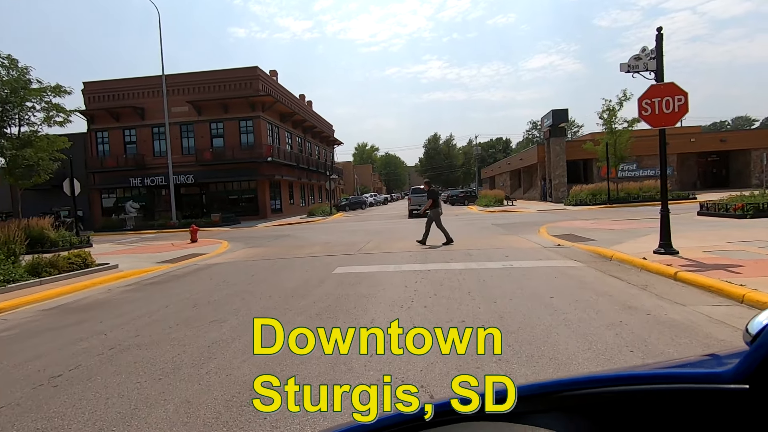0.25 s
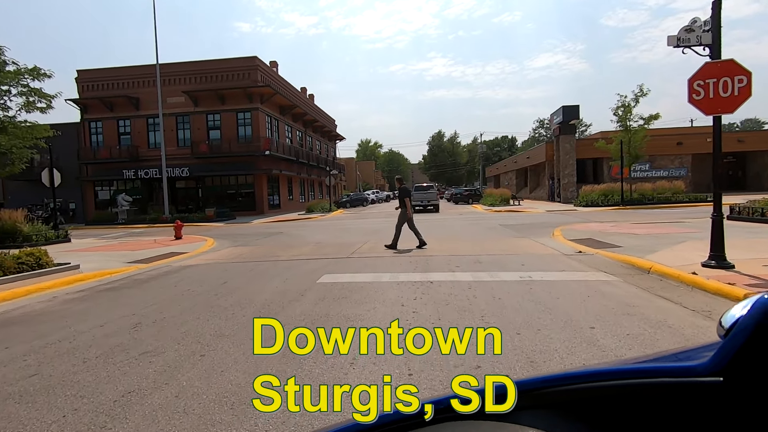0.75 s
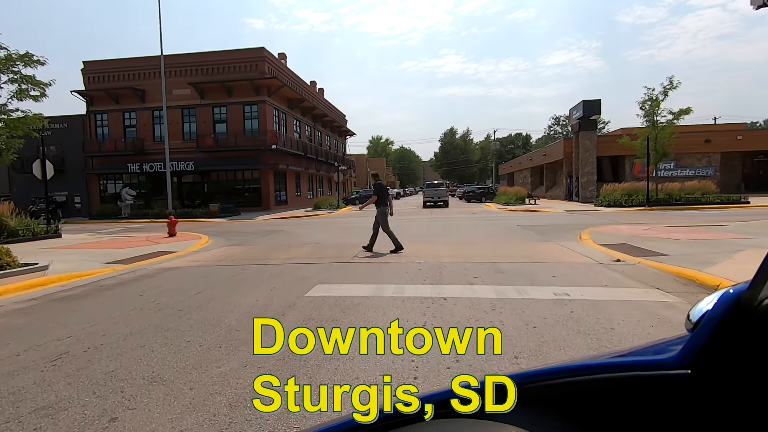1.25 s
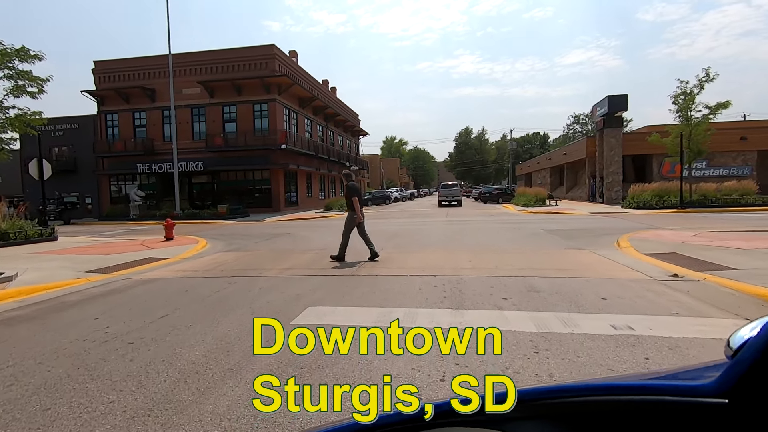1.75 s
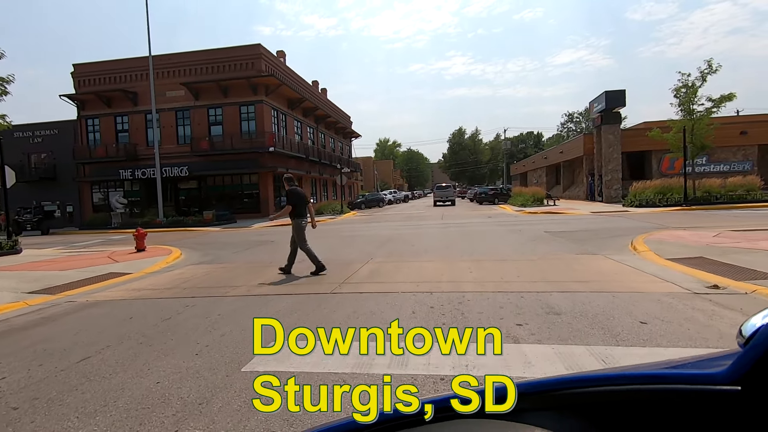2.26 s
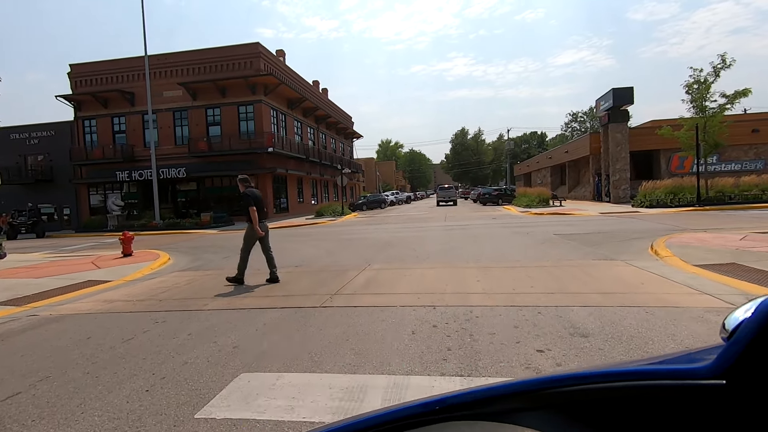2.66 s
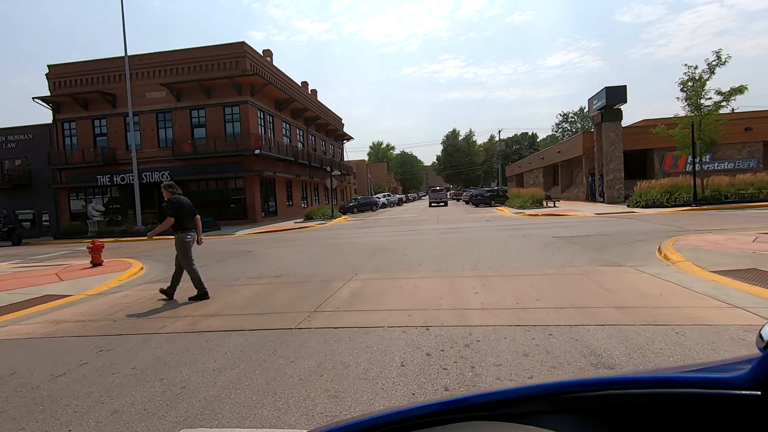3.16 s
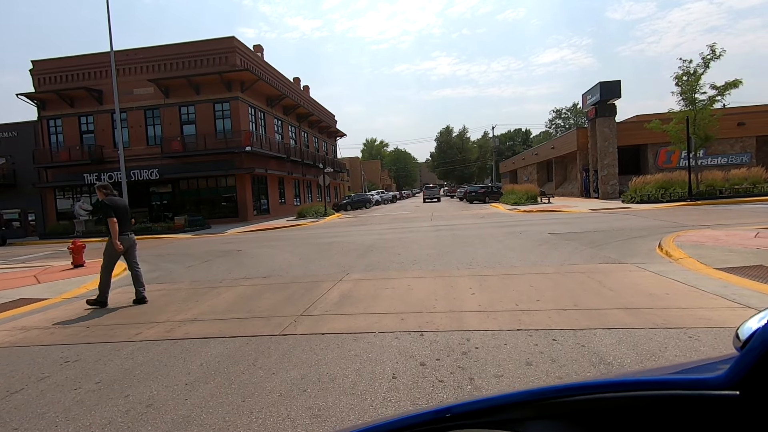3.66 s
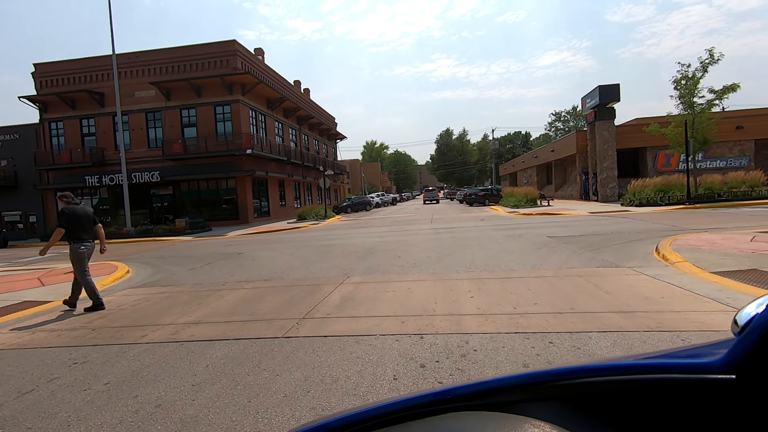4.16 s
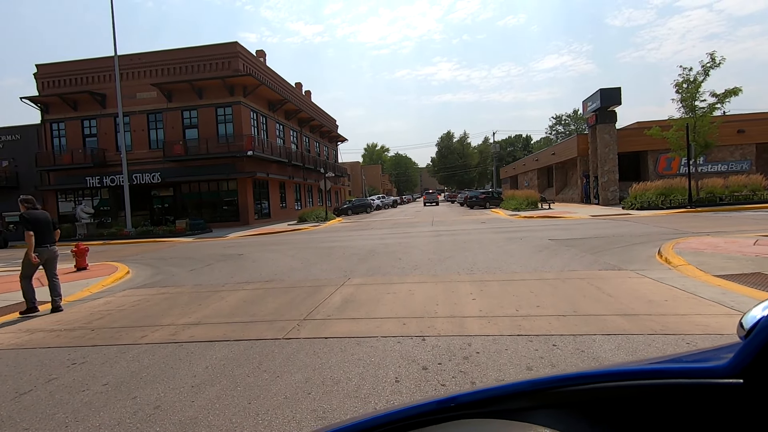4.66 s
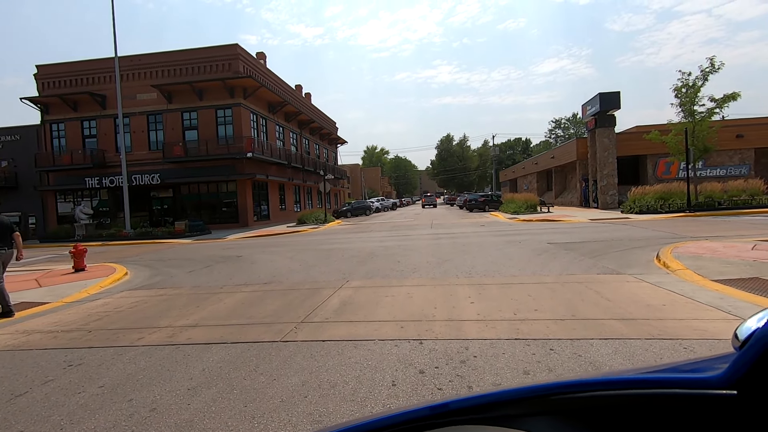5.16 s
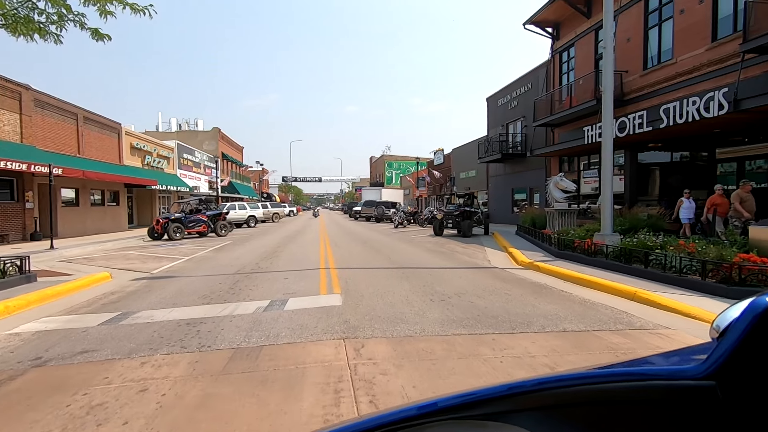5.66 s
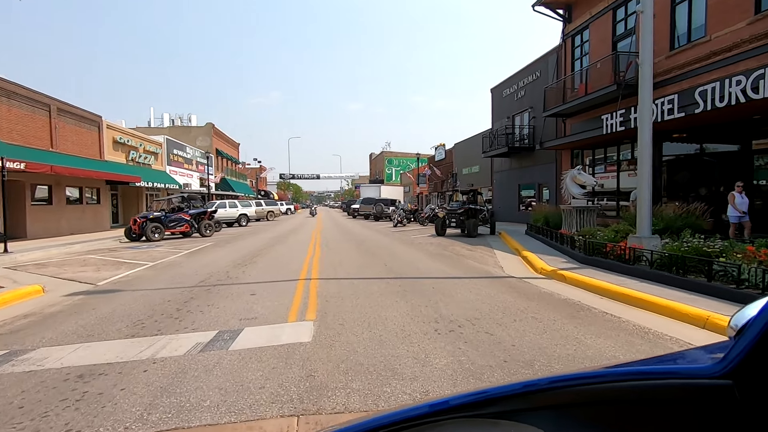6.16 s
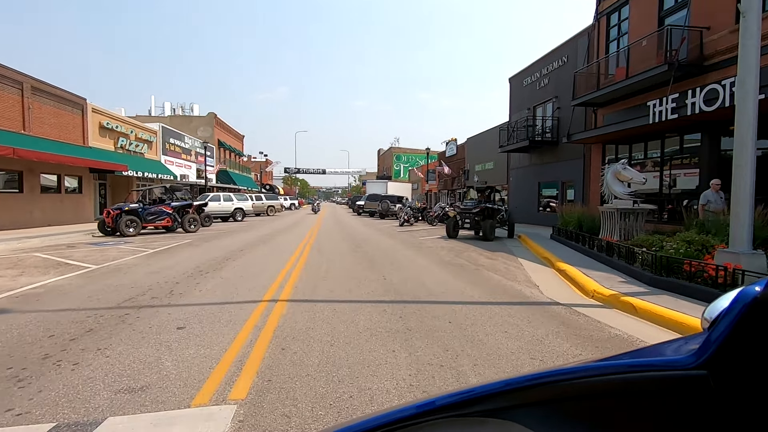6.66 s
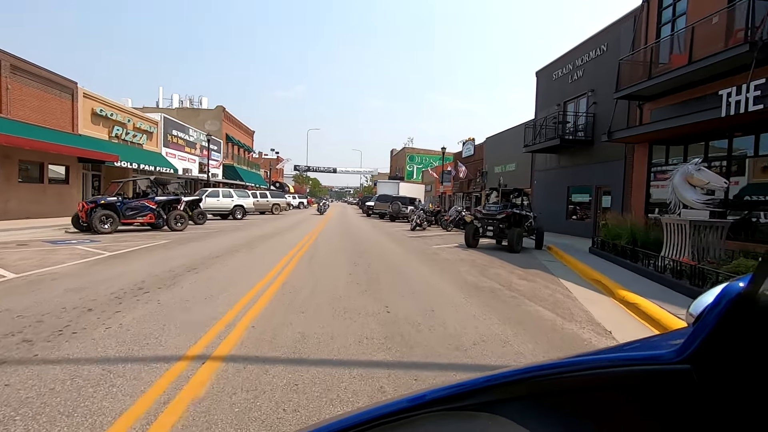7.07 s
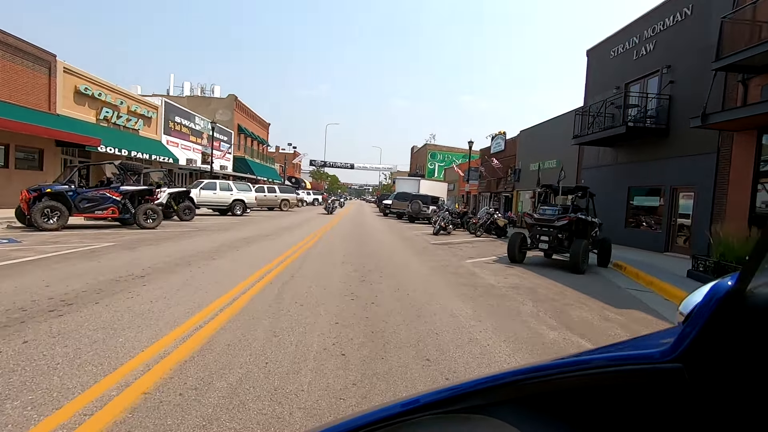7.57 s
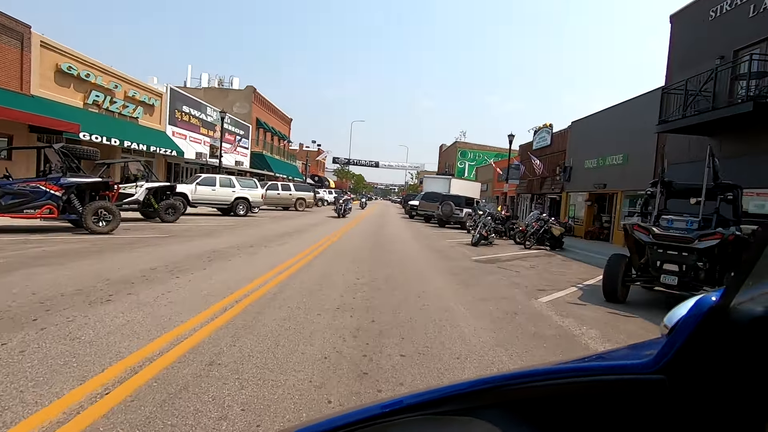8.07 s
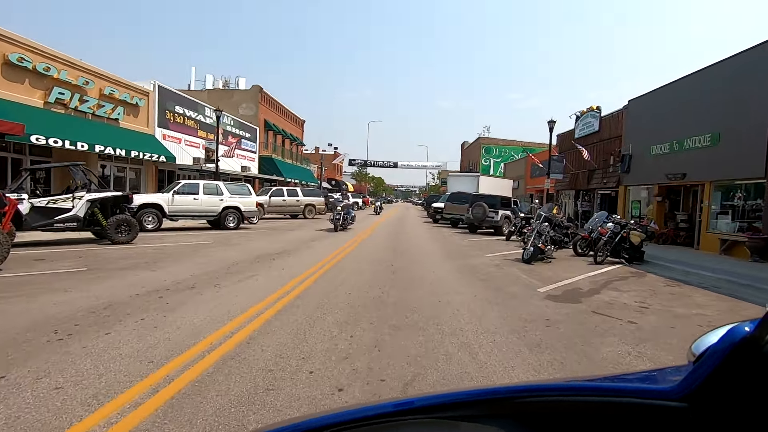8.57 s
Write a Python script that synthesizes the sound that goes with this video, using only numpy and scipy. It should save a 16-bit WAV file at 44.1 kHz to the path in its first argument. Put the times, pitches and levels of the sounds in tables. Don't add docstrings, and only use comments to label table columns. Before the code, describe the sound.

The sound starts abruptly with a tiny tick, close on a big V-twin motorcycle outdoors. From 0 to 5.2 seconds it idles at about eight uneven cycles a second: deep paired exhaust beats, some weak, with casing rumble, wavering primary whine, panel buzz, rattle and bright valve ticks. Low wind gusts bump the microphone around 1.3 to 2.3; thin, high brake squeaks come near 2.6 and 2.9. A lever clicks at 4.8. At 5.24 first gear clunks in with bright clicks and repeated low thuds as the exhaust drops away. At 5.4 a hard cut brings a faster, smoother drone with tyre hiss. Revs hold until about 6.5, sag to 7.5, then recover slightly. Knocks land near 6.9 and 7.4, a faint rising belt note sings around 7.65, and wind, rattle and quick trim taps grow from 8.1 to the end at about 8.8.

```python
import sys
import numpy as np
from scipy import signal
from scipy.fft import rfft, irfft, next_fast_len
from scipy.io import wavfile
from scipy.ndimage import uniform_filter1d, map_coordinates

SR = 44100
rng = np.random.default_rng(int(sys.argv[2]) if len(sys.argv) > 2 else 0)


def transcribe(signal):
    frames = np.atleast_2d(signal).T
    limited = np.clip(frames, -1, 1)
    pcm = np.round(limited * 32767).astype(np.int16)
    wavfile.write(sys.argv[1], SR, pcm)


def ratio_of_db(decibels):
    return 10 ** (np.asarray(decibels, float) / 20)


N = 388962
T = np.arange(N) / SR
ROLLING_S = 5.4083
STANDING = T < ROLLING_S
LEAD = SR // 8


def unit(x):
    return x / np.sqrt(np.mean(x ** 2) + 1e-20)


def column(rows, count):
    rows = np.array(rows)
    return np.interp(T, rows[:, 0], rows[:, count])


def wobble(rate):
    knots = rng.standard_normal(int(N * rate / SR) + 4)
    return map_coordinates(knots, [T * rate])


def filtered(x, response):
    m = next_fast_len(len(x) + SR // 2)
    return irfft(rfft(x, m) * response(np.fft.rfftfreq(m, 1 / SR)), m)[:len(x)]


def noise(spectrum):
    hz, db = np.transpose(spectrum)
    colour = lambda f: ratio_of_db(np.interp(np.log(f + 1), np.log(hz + 1), db))
    return unit(filtered(rng.standard_normal(N), colour))


def bump(turn, place, sharp):
    return np.exp(sharp * (np.cos(2 * np.pi * (turn - place)) - 1))


def by_scene(standing, rolling):
    return np.where(STANDING, standing, rolling)


def since_gear():
    return np.clip(T - 5.235, 0, None) * STANDING


# time in seconds, shake in dB.
SHAKE = [(0, 3), (.4, 0), (1.4, -0.5), (2.8, -2.5), (3.35, 3), (4.3, 5), (5.2, 2), (5.41, 3), (6.2, 0),
         (6.8, 1.5), (7.05, 5.5), (7.9, 4.5), (8.2, 8), (8.82, 10.5)]


def shaken_db(rest_db, growth, gear_db):
    bite = np.clip(since_gear() / .015, 0, 1)
    return by_scene(*rest_db) + by_scene(*growth) * column(SHAKE, count=1) + gear_db * bite


def clatter_db():
    return shaken_db(rest_db=(-58, -53), growth=(0.58, 0.33), gear_db=5)


# time in seconds, four-stroke cycles a second.
IDLE_SPEED = [(0.068, 8.045), (1.22, 8.281), (1.6, 7.85), (2.09, 8.515), (2.28, 8.039), (2.77, 7.865),
              (2.96, 8.248), (3.38, 7.855), (3.86, 8.723), (4.71, 8.011), (5.41, 8.551)]
# time in seconds, cycles a second.
RIDE_SPEED = [(5.413, 22.616), (6.43, 22.474), (6.8, 21.198), (7.34, 15.687), (7.57, 14.854),
              (7.74, 15.567), (8.82, 16.461)]


def cycles(speed):
    done = np.cumsum(column(speed, count=1)) / SR
    return done - done[round(speed[0][0] * SR)]


def gas_pulses(turn, places, pulses, pipe, low_hz, cut_hz, lean=()):
    whole = np.arange(np.floor(turn[0]), turn[-1])
    mode_hz, width_hz, *strength = np.transpose(pipe)[:, :, None]
    strength = strength + strength[-1:]
    first_s = 1 / SR / (turn[1] - turn[0])
    soft = lambda f: 1 / (1 + 1j * f / low_hz) ** 2 / (1 + (f / cut_hz) ** 8)
    out = np.zeros(N + LEAD)
    for k, (place, (db, scatter_db, scatter_s), share) in enumerate(zip(places, pulses, strength)):
        luck = rng.standard_normal((len(whole), 2))
        at = np.interp(whole + place, np.r_[turn[0] - 1, turn], np.r_[-first_s, T])
        at = at + scatter_s * luck[:, 0]
        rear = k == 1
        loss_db = sum(loss * (abs(at - s) < .04) for s, loss in lean) * rear
        size = ratio_of_db(db - loss_db + scatter_db * luck[:, 1])
        inside = (at > -LEAD / SR) & (at < T[-2])
        sample = (at[inside] * SR + LEAD).astype(int)
        blows = np.bincount(sample, size[inside], N + LEAD)

        def ring(f):
            damping = 1j * f * width_hz
            return np.sum(share * damping / (mode_hz * mode_hz - f * f + damping), axis=0)

        out = out + filtered(blows, lambda f: ring(f) * soft(f))
    return unit(out[LEAD:])


# level in dB, size scatter in dB, time scatter in seconds.
IDLE_PULSES = [
    (0, .5, .0002),
    (1, 1, .0014),
    (.7, 1.2, .0008),
    (-8, 2, .006),
]
RIDE_PULSES = [
    (0, .4, .0001),
    (.6, .7, .0002),
    (0, 1.2, .0003),
    (-14, 3, .004),
]
# centre in Hz, width in Hz,
# then signed strength (ratio) for front, rear and intake.
IDLE_PIPE = [(56, 9.8, -.288, -.043, .368), (83.9, 39, .283, -.123, -.301), (116.5, 22.5, .934, -.531, .09),
             (135, 27.3, -1, .706, .088), (153.6, 24, .343, -.289, -.034), (190, 13, -.1, -.4, .34)]
RIDE_PIPE = [(41.9, 13, .039, -.034, .094), (80, 22, -.46, -.45, .25), (121.1, 67.6, .609, .251, -.254),
             (134.4, 28.1, .402, .288, .22), (166, 35.2, -1, -.191, -.102), (201, 12, -.031, -.72, -.025),
             (224, 26.6, .027, .243, .151), (248.8, 52.7, -.227, -.224, .093), (272, 16, .21, -.21, .05),
             (303.8, 131.8, .098, .069, -.044)]
# time in seconds, loss in dB.
MISFIRES = [(.37, 6), (.61, 1.5), (.85, 6), (1.1, 1), (1.34, 6.5), (1.46, 4.5), (2.2, 10.5), (2.45, 4.5),
            (2.7, 5), (3.32, 4), (3.93, 9), (4.16, 2)]


def exhaust(idle, ride):
    lope = gas_pulses(idle, (.015, .41, .759, .56), IDLE_PULSES, IDLE_PIPE, low_hz=203, cut_hz=300, lean=MISFIRES)
    drone = gas_pulses(ride, (.02, .46, .758, .65), RIDE_PULSES, RIDE_PIPE, low_hz=129, cut_hz=380)
    octaves = np.log2(column(RIDE_SPEED, count=1) / 28.3)
    revs_db = 3.5 * octaves * ~STANDING
    drag_db = 74.5 * since_gear()
    return ratio_of_db(by_scene(-16, -13) + revs_db - drag_db) * by_scene(lope, drone)


RATTLE = (.065, .2, .45, .56, .73)


def meshing(turn, teeth, slack):
    surge = .5 * np.sin(4 * np.pi * turn) + 1.8 * np.sin(2 * np.pi * turn + 0.65) + 1.72 * wobble(45)
    mesh = 2 * np.pi * teeth * turn + slack * surge
    knocks = sum(bump(turn, place, sharp=51) for place in RATTLE)
    chatter = (.36 + slack * knocks) * ratio_of_db(2.0 * wobble(40))
    return unit(chatter * (np.sin(mesh) + ratio_of_db(-22.0) * np.sin(2 * mesh)))


def primary_drive(idle, ride):
    whine = by_scene(meshing(idle, teeth=69.8, slack=.85), meshing(ride, teeth=61.5, slack=.3))
    return ratio_of_db(shaken_db(rest_db=(-39, -65.5), growth=(0.73, .8), gear_db=-26.5)) * whine


def firing_force(turn):
    front = np.exp(-((turn - .04) % 1) / 0.055)
    rear = 0.91 * np.exp(-((turn - .46) % 1) / 0.023)
    return uniform_filter1d(uniform_filter1d(front + rear, size=100), size=100)


# frequency in Hz, density in dB per Hz.
CASING = [(150, -36), (230, -2), (280, -9), (459, -16.5), (683, -15), (781, -21.5), (942, -25),
          (1500, -28.5), (1950, -49), (3300, -120)]


def casing(firing):
    rumble = unit((1.1 + firing) * ratio_of_db(1.2 * wobble(30)) * noise(CASING))
    return ratio_of_db(shaken_db(rest_db=(-45, -43.5), growth=(0.75, 1.21), gear_db=7.5) + 3.5) * rumble


def cover(turn):
    mode = [(300, -120), (600, -25.5), (740, 3.5), (790, 4), (850, -5.5), (1000, -34.5), (2000, -120)]
    buzz = unit((2.0 + bump(turn, 0.71, sharp=8.6)) * ratio_of_db(1.1 * wobble(35)) * noise(mode))
    return ratio_of_db(clatter_db() + by_scene(9, 4)) * buzz


# frequency in Hz, density in dB per Hz.
CLATTER = [(150, -90), (500, -22), (900, -2.5), (1330, -4.5), (1600, -10.5), (2000, -8), (2700, -6),
           (3150, -7), (4300, -14.5), (6100, -21), (8900, -26), (9600, -34), (12000, -37), (16000, -58)]


def clatter(firing):
    rattle = unit((0.86 + firing) * ratio_of_db(0.52 * wobble(45)) * noise(CLATTER))
    return ratio_of_db(clatter_db() + by_scene(5, 2)) * rattle


# frequency in Hz, density in dB per Hz.
TAPPETS = [(1000, -93), (1950, -17), (2250, -1), (2600, -18.5), (8800, -56.5), (9700, -32), (10150, -25),
           (10800, -31), (14000, -92.5)]


def valves(turn):
    taps = .07 + bump(turn, .2, sharp=160) + bump(turn, .7, sharp=70)
    ticks = unit(taps * ratio_of_db(1.5 * wobble(16)) * noise(TAPPETS))
    return ratio_of_db(clatter_db() + by_scene(-6.5, -13)) * ticks


# frequency in Hz, density in dB per Hz.
BUFFET = [(8, -24), (24, -7), (40, -3), (55, -9), (100, -13), (200, -22), (400, -50), (1500, -120)]
# time in seconds, dB over the breeze, half length in seconds.
GUSTS = [
    (1.35, 3, 0.11),
    (1.75, 9, 0.075),
    (2.03, 7, 0.052),
    (2.27, 5, .06),
    (5.889, -6.5, 0.25),
    (7.2, -6.5, 0.63),
    (8.057, 7, 0.15),
    (8.45, 4.5, 0.13),
    (8.747, 6, 0.58),
]


def wind():
    gust_db = -29.5 + sum(db * np.exp(-((T - s) / half) ** 2) for s, db, half in GUSTS)
    return ratio_of_db(gust_db) * unit(ratio_of_db(1.2 * wobble(7.5)) * noise(BUFFET))


def contacts(rows, width):
    out, t = np.zeros(N + SR), T[:SR // 8]
    for s, db, hz, t60 in rows:
        burst = rng.standard_normal(len(t)) * ratio_of_db(-60 * t / max(t60, .004)) * (1 - np.exp(-t / 0.0002))
        damping = lambda f: 1j * f * width * hz
        burst = filtered(burst, lambda f: (damping(f) / (hz * hz - f * f + damping(f))) ** 2)
        out[round(s * SR):][:len(t)] += ratio_of_db(db) * burst / np.abs(burst).max()
    return out[:N]


# start in seconds, peak in dB, centre in Hz, t60 in seconds.
KNOCKS = [(1.546, -34, 596, 0.027), (4.836, -26, 1090, 0.047), (5.236, -21.5, 780, 0.023),
          (5.256, -16, 277, .06), (5.307, -15, 280, 0.074), (5.3, -20, 700, 0.049),
          (5.257, -20, 630, 0.055), (5.287, -21.5, 1230, 0.03), (5.29, -23.5, 740, 0.027),
          (5.305, -23.5, 376, 0.12), (5.341, -23, 402, 0.049), (5.38, -22.5, 496, 0.11),
          (5.56, -29.5, 784, 0.031), (6.938, -24.5, 587, 0.029), (7.129, -44.5, 687, 0.047),
          (7.381, -29, 680, 0.047), (8.229, -27.5, 650, 0.058)]


def knocks():
    return contacts(KNOCKS, width=0.45)


# centre time in seconds, level in dB, pitch in Hz, half length in seconds.
SQUEAKS = [
    (2.634, -59, 6140, 0.017),
    (2.875, -54, 6320, 0.019),
    (2.928, -59, 6270, 0.0073),
]


def brake():
    out = 0
    for s, db, hz, half in SQUEAKS:
        out = out + ratio_of_db(db) * np.exp(-((T - s) / half) ** 2) * np.sin(2 * np.pi * hz * T)
    return out


# start in seconds, peak in dB, centre in Hz, t60 in seconds.
CLICKS = [
    (4.836, -39.5, 3000, 0.052),
    (4.836, -40, 7000, 0.037),
    (5.236, -31, 2650, 0.057),
    (5.237, -31, 6700, 0.072),
    (5.238, -53, 10900, 0.018),
    (5.246, -35, 5500, 0.05),
    (5.254, -32.5, 4550, 0.092),
    (5.343, -44.5, 6000, 0.1),
    (7.275, -32, 4770, 0.0078),
]


def clicks():
    return contacts(CLICKS, width=0.23)


# start in seconds, level in dB, pitch in Hz (sign of first swing), t60 in seconds.
THUDS = [
    (5.261, -3, -85, .075),
    (5.3075, -1.5, 105, .075),
    (5.3415, -3, 85, .065),
    (5.379, -1.5, 105, .085),
]


def gearbox():
    out = 0
    for s, db, hz, t60 in THUDS:
        t = np.clip(T - s, 0, None)
        sag = t + 0.0052 * (1 - np.exp(-t / 0.0099))
        out = out + ratio_of_db(db - 60 * t / t60) * np.sin(2 * np.pi * hz * sag) * (1 - np.exp(-t / 0.0018))
    return out


# frequency in Hz, density in dB per Hz.
ROAD = [(200, -96.5), (700, -29.5), (1200, -13), (1500, -13), (1750, -1), (2130, -1.5), (2550, -14),
        (2800, -5), (3150, -5.5), (3700, -10), (5500, -17.5), (7000, -30), (10000, -45.5), (16000, -87)]


def road():
    hiss = unit(ratio_of_db(1.9 * wobble(98) + 0.55 * wobble(8)) * noise(ROAD)) * ~STANDING
    return ratio_of_db(clatter_db() + 4.0) * hiss


# start in seconds, peak in dB, centre in Hz.
TRIM = [(6.938, -46, 2030), (7.869, -31.5, 2030), (8.142, -35, 3300), (8.18, -36, 4900), (8.201, -35, 4330),
        (8.246, -29.5, 3200), (8.25, -34, 5030), (8.33, -37, 4500), (8.377, -32, 3030), (8.402, -37, 4970),
        (8.451, -35.5, 3100), (8.484, -37.5, 4880), (8.517, -36, 3100), (8.545, -44, 5500),
        (8.602, -39.5, 5310), (8.655, -37.5, 3100), (8.661, -41, 5600), (8.77, -41, 3600),
        (8.808, -45.5, 5500)]


def trim():
    return ratio_of_db(-0.5) * contacts([(*tap, 0.023) for tap in TRIM], width=0.23)


def belt():
    since = T - 7.65
    start_hz, rise_hz_per_s, half_s = 920, 160, .3
    mesh = 2 * np.pi * (start_hz + rise_hz_per_s * since / 2) * since + 0.66 * wobble(25)
    return ratio_of_db(-50 + 2.5 * wobble(9.5)) * np.exp(-(since / half_s) ** 4) * np.sin(mesh)


def scene():
    idle, ride = cycles(IDLE_SPEED), cycles(RIDE_SPEED)
    turn = by_scene(idle, ride)
    firing = firing_force(turn)
    engine = exhaust(idle, ride) + primary_drive(idle, ride)
    engine = engine + casing(firing) + cover(turn) + clatter(firing) + valves(turn)
    metal = knocks() + clicks() + gearbox() + trim()
    return (engine + wind() + brake() + metal + road() + belt())[None]


def low_pass(x):
    return signal.sosfilt(signal.butter(12, 15670, fs=SR, output="sos"), x)


def record(dry):
    squeezed = dry / (1 + np.abs(dry / 0.78) ** 4) ** (1 / 4)
    start_tick = ratio_of_db(-22) * (np.arange(N) == 6)
    return low_pass(squeezed + start_tick)


dry = scene()
out = record(dry)
transcribe(out)
```